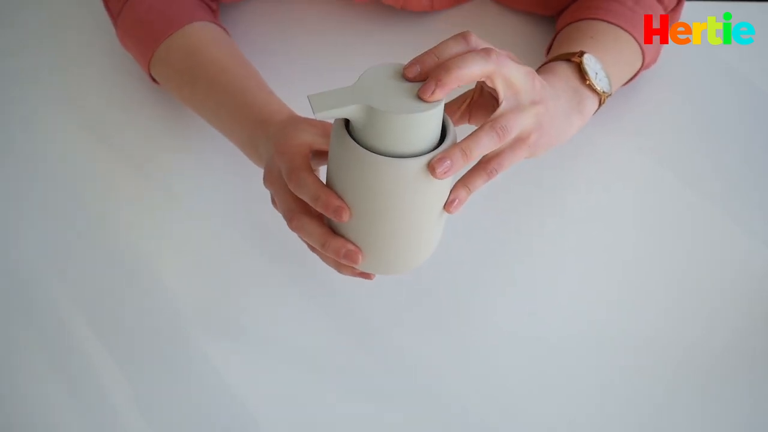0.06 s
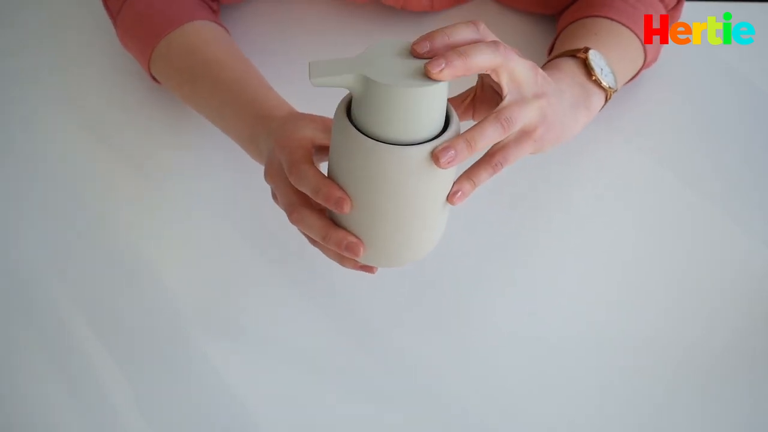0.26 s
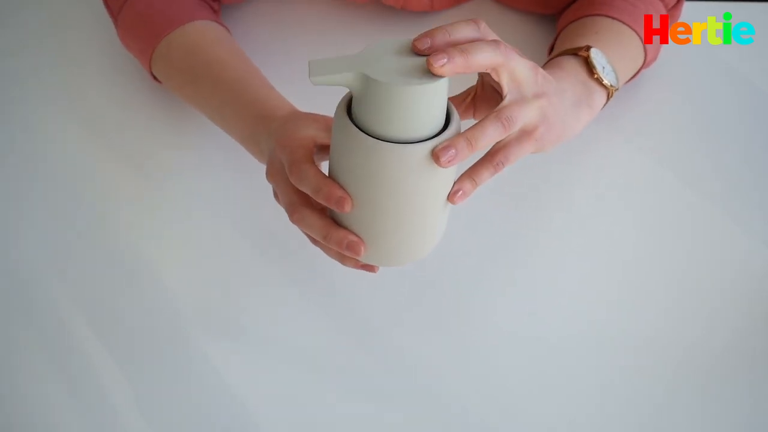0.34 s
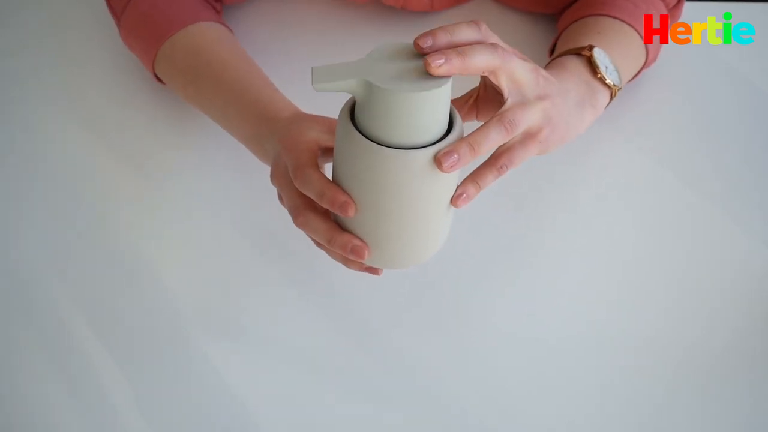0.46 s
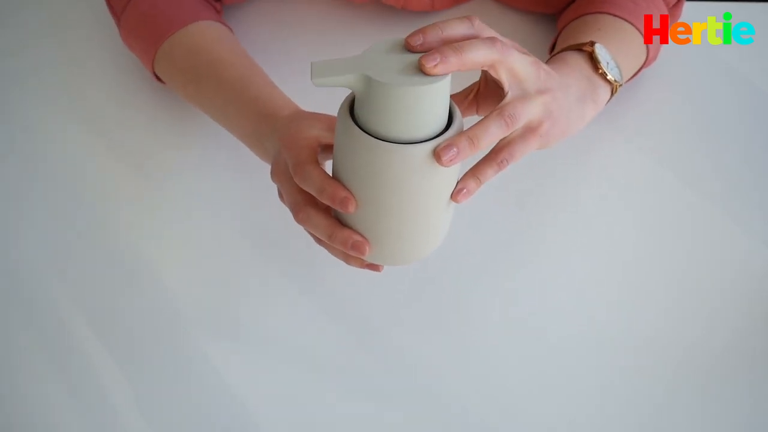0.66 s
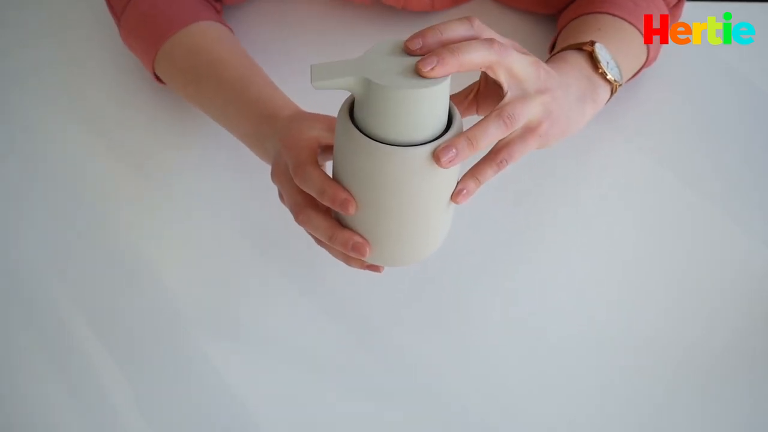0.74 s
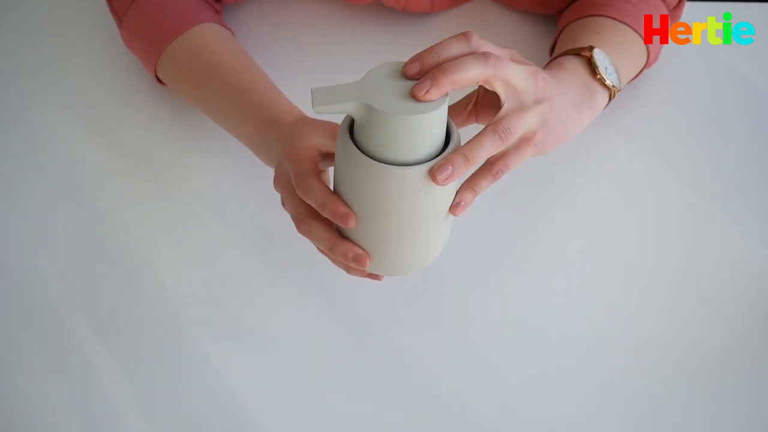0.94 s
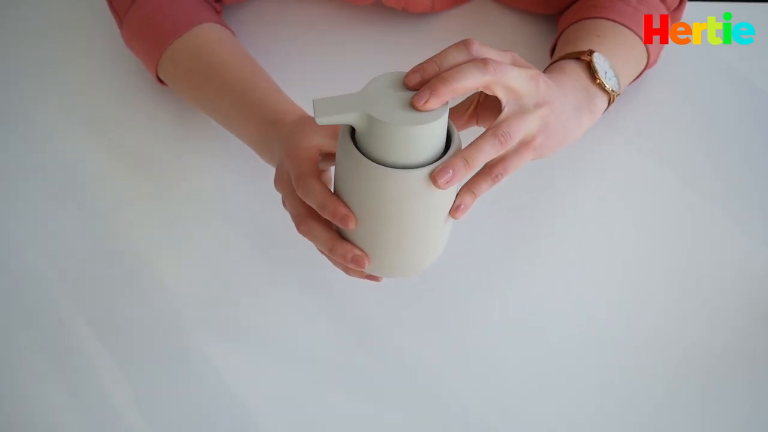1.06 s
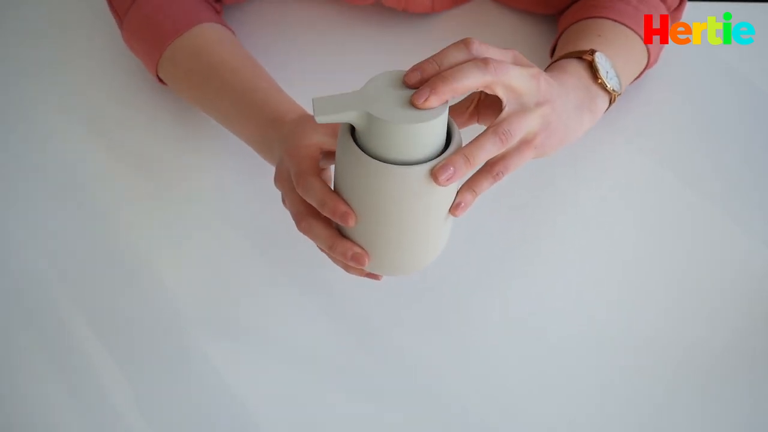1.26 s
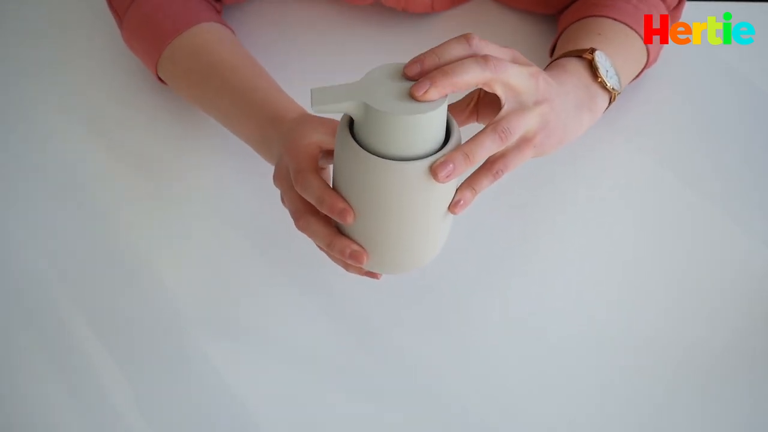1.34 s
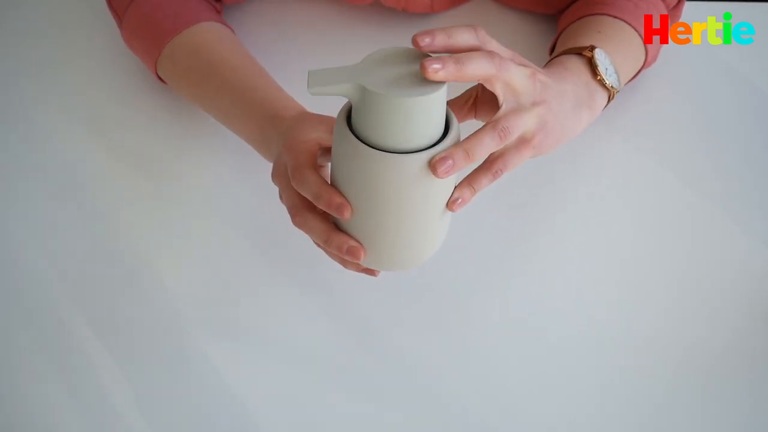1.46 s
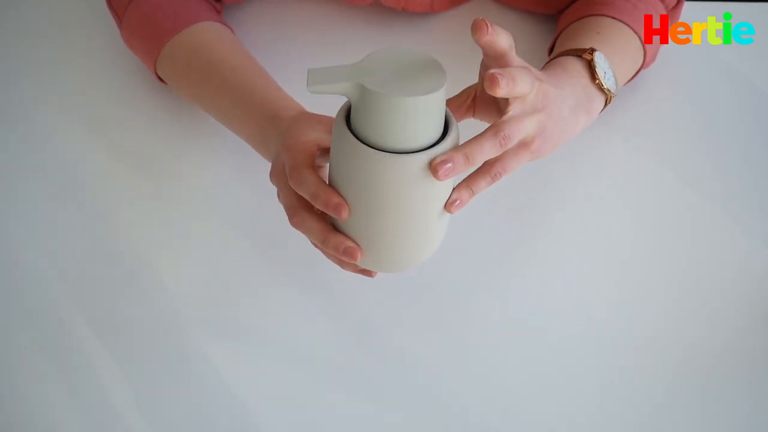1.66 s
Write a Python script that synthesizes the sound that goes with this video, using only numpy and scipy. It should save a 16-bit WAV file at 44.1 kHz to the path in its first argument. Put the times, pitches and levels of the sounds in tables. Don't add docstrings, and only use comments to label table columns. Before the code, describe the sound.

A hand works a soap dispenser pump, heard very close in a small reverberant room with steady low hum and hiss. A faint rub fades at the start; the plunger scrapes up to a loud, slightly distorted hollow clack at 0.24 s, and the jar rings. A soft thump comes at 0.4, a push with scraping and thud at 0.9, a faint tap at 1.28, then a second clack and rattle at 1.4.

```python
import sys
import numpy as np
from scipy import signal
from scipy.fft import rfft, irfft, next_fast_len
from scipy.io import wavfile
from scipy.ndimage import uniform_filter1d, map_coordinates

SR = 44100
rng = np.random.default_rng(int(sys.argv[2]) if len(sys.argv) > 2 else 0)


def transcribe(u):
    v = np.clip(np.atleast_2d(u).T, -1, 1)
    q = np.round(v * 32767).astype(np.int16)
    wavfile.write(sys.argv[1], SR, q)


def volts_from_db(level):
    exponent = np.asarray(level, float) / 20
    return 10 ** exponent


N = 74970


def unit(x):
    return x / np.sqrt(np.mean(x ** 2) + 1e-20)


def along(points, hz):
    f, value = np.transpose(points)
    return np.interp(np.log(hz + 1), np.log(f + 1), value)


def curves(rows):
    s, *columns = np.transpose(rows)
    return [np.interp(np.arange(N) / SR, s, column) for column in columns]


def filtered(x, response):
    size = next_fast_len(N + SR // 2)
    hz = np.fft.rfftfreq(size, 1 / SR)
    return irfft(rfft(x, size) * response(hz), size)[..., :N]


def ring(s, hz, db, t60, rise):
    t = np.maximum(np.arange(N) / SR - s, 0)
    return volts_from_db(db - 60 * t / t60) * (1 - np.exp(-t / rise)) * np.sin(2 * np.pi * hz * t)


# frequency in Hz, density in dB per Hz.
AIR_SPECTRUM = [(12, -40.5), (20, -7.5), (141, 3.5), (254, -7), (335, -7.5), (510, -15.5), (1150, -22.5),
                (1430, -22.5), (15800, -30.5)]


def air():
    hiss = filtered(rng.standard_normal(N), lambda f: volts_from_db(along(AIR_SPECTRUM, f)))
    return volts_from_db(-65) * unit(hiss)


# frequency in Hz, width in Hz, level in dB.
BARREL_MODES = [(1500, 390, -15.5), (3000, 110, 8.5), (3555, 1400, -2.5), (6000, 1300, 0.5),
                (7215, 900, -4), (10260, 2500, -12.5), (12100, 3000, -16)]


def barrel(x):
    def response(f):
        total = 0
        for k, (center, width, db) in enumerate(BARREL_MODES):
            band = 1j * f * width / (center * center - f * f + 1j * f * width)
            total = total + (-1) ** k * volts_from_db(db) * band
        return total
    return filtered(x, response)


# time in seconds, rub level in dB, cavity level in dB over the rub, cavity pitch in Hz.
PLUNGER_STROKES = [
    [(0, -75.5, 7, 894), (.03, -80, 6, 880), (.08, -93, 5, 878)],
    [(.168, -94.5, 2, 900), (.182, -52, 1.5, 920), (.192, -53, 4, 920), (.206, -55.5, 1, 983.5),
     (.22, -42.5, -3, 1000), (.23, -44.5, 2, 1050), (.25, -56, -5.5, 1110), (.275, -96, -1, 1100)],
    [(.884, -85, 7, 1150), (.896, -51.5, 4, 1112), (.912, -64.5, -2.5, 1119), (.96, -69, 5, 1110),
     (.972, -50.5, 3, 1096), (.99, -65, 3.5, 1080), (1.04, -55.5, -0.5, 1026), (1.134, -66.5, 4.5, 894),
     (1.146, -98, 10, 876)],
    [(1.315, -85, -6, 900), (1.336, -52, 7, 910), (1.35, -55, -5.5, 937), (1.361, -65.5, 2, 950),
     (1.367, -47, -9, 935), (1.378, -39.5, 6.5, 969), (1.392, -44.5, -6.5, 1050), (1.42, -58, 5, 1110),
     (1.44, -82, 4, 1090)],
]
# start in seconds, end in seconds.
PLUNGER_MOVES = [(0, .09), (.165, .28), (.88, 1.15), (1.31, 1.45)]


def strokes():
    cavity_width_hz, grit_per_s, grit_db, smooth_share = 120, 2000, 5, .6
    rub_db, cavity_db, hz = curves([row for stroke in PLUNGER_STROKES for row in stroke])
    size, sign, smooth = rng.standard_normal((3, N))
    grains = rng.random(N) < grit_per_s / SR
    grit = grains * volts_from_db(grit_db * np.clip(size, -2, 2)) * np.sign(sign)
    drag = smooth_share * smooth + (1 - smooth_share) * unit(grit)
    turn = np.exp(2j * np.pi * np.cumsum(hz) / SR)
    pole = np.exp(-np.pi * cavity_width_hz / SR)
    cavity = (turn * signal.lfilter([1], [1, -pole], drag / turn)).real
    t = np.arange(N) / SR
    moving = sum((t >= a) & (t < b) for a, b in PLUNGER_MOVES) * 1.0
    moving = uniform_filter1d(moving, size=300)
    return moving * volts_from_db(rub_db) * (unit(barrel(drag)) + volts_from_db(cavity_db) * unit(cavity))


THUMP_TIMES = [.416, .904, 1.335, .188]
# level in dB, pitch factor, tilt in dB per octave above 120 Hz.
THUMP_LEVELS = [(-32.5, .86, -3), (-27.5, 0.93, -3), (-43, 0.52, 2), (-46, .9, -0.5)]
TABLE_PITCHES = [120, 100, 217, 186, 285, 350, 475, 560, 750]
# level in dB, decay by 60 dB in seconds.
TABLE_MODES = [(1, .11), (-7.5, .1), (-3, 0.19), (-7.5, 0.061), (-4.5, .16), (-12, .1), (-15.5, 0.079),
               (-18.5, 0.099), (-17.5, 0.025)]
# time in seconds, level in dB.
ARM_SWAY = [
    (.4, -103),
    (.49, -50),
    (.55, -62),
    (.62, -63.5),
    (.7, -92.5),
]


def table():
    rise_s, rumble_db, rumble_t60_s, rumble_hz = 0.0029, -14.5, 0.32, 320
    t = np.arange(N) / SR
    thump, fade = np.zeros(N), np.zeros(N)
    for s, (db, pitch, tilt_db) in zip(THUMP_TIMES, THUMP_LEVELS):
        for hz, (level, t60) in zip(TABLE_PITCHES, TABLE_MODES):
            mode_db = db + level + tilt_db * np.log2(hz / 120)
            thump += ring(s, hz * pitch, mode_db, t60, rise_s)
        swell = 1 - np.exp(-np.maximum(t - s, 0) / rise_s)
        fade += swell * volts_from_db(db + rumble_db - 60 * np.abs(t - s) / rumble_t60_s)
    thump = filtered(thump, lambda f: (1j * f / (50 + 1j * f)) ** 2)
    rumble = filtered(rng.standard_normal(N),
                      lambda f: f ** 3 / (f ** 3 + 150 ** 3) / (1 + (f / rumble_hz) ** 2))
    sway = filtered(rng.standard_normal(N), lambda f: f / (1 + (f / 32) ** 5))
    return thump + fade * unit(rumble) + volts_from_db(curves(ARM_SWAY)[0]) * unit(sway)


# time in seconds, level in dB.
SEAL_SLIPS = [(.1943, -29), (0.4, -35), (1.3415, -28.5), (1.332, -41.5), (1.372, -29.5), (.894, -37.5),
              (0.35, -51), (1.381, -40.5)]


def slips():
    s, _, _, hz = np.transpose([row for stroke in PLUNGER_STROKES for row in stroke])
    t = np.arange(N) / SR
    scratch, cavity = np.zeros(N), np.zeros(N)
    for at, db in SEAL_SLIPS:
        scratch += (t > at) * volts_from_db(db - 9 - 60 * np.abs(t - at) / 0.011)
        cavity += ring(at, np.interp(at, s, hz), db, 0.033, 0.00066)
    return barrel(scratch * rng.standard_normal(N)) + cavity


# time in seconds, peak in dB.
HEAD_CLACKS = [
    (.2379, 2),
    (1.39422, 2),
]
CLACK_EDGE = [2, -5]
# frequency in Hz, level in dB, decay by 60 dB in seconds, rise in seconds.
HEAD_MODES = [(1150, -22.5, .035, .002), (1370, -24, 0.011, 0.0012), (1896, -31, .05, 0.0015),
              (2500, -25, .005, .0004), (3175, -23.5, 0.011, 0.00013), (3630, -11, 0.0031, 0.0002),
              (4000, -15.5, 0.0028, 0.00046), (5590, -29, .012, .0003), (7447, -29, 0.0054, 0.0009)]
# delay in seconds, level in dB.
NEAR_ECHOES = [
    (.00265, -14),
    (.00435, -12),
]


def clacks():
    edge_hz, crack_db, crack_t60_s = 3300, -22, .01
    knock_hz, knock_peak_s, knock_fall = 1055, .0013, .75
    body_hz, body_db, body_t60_s = 520, -14.5, .011
    echo_hz, echo_width_hz = 1120, 800
    t = np.arange(N) / SR
    direct = np.zeros(N)
    for (s, db), edge in zip(HEAD_CLACKS, CLACK_EDGE):
        for hz, level, t60, rise in HEAD_MODES:
            direct -= ring(s, hz, db + level + edge * (hz > edge_hz), t60, rise)
        u = np.maximum(t - s, 0) / knock_peak_s
        press = np.abs(np.sin(np.pi * u / 2)) ** 1.3
        release = np.exp(-((u - 1) / knock_fall) ** 2)
        push = np.where(u < 1, press, release)
        direct -= volts_from_db(db) * push * np.sin(2 * np.pi * knock_hz * (t - s))
        direct += ring(s, body_hz, db + body_db, body_t60_s, 0.00087)
        crack = volts_from_db(db + crack_db - 60 * np.abs(t - s) / crack_t60_s)
        direct += (t > s) * crack * rng.standard_normal(N)

    def reflected(f):
        band = 1j * f * echo_width_hz / (echo_hz ** 2 - f * f + 1j * f * echo_width_hz)
        echoes = sum(volts_from_db(db) * np.exp(-2j * np.pi * f * s) for s, db in NEAR_ECHOES)
        return (1 + band * echoes) / (1 + 1j * f / 8000) ** 2
    return filtered(direct, reflected)


JAR_PITCHES = [1150, 1156, 1166, 1098, 1075, 1215, 1386, 1892, 930, 810]
# level in dB, decay by 60 dB in seconds.
JAR_MODES = [(-29.5, 0.18), (-39.5, .55), (-44.5, 1), (-49, .5), (-35, .35), (-40, 0.65), (-42.5, 0.15),
             (-56.5, .42), (-47.5, 0.17), (-47, .35)]


def jar():
    waver_db, waver_per_s = 3, 40
    knots = rng.standard_normal((len(JAR_MODES), 100))
    place = np.arange(N) * waver_per_s / SR
    ringing = np.zeros(N)
    for k, (level, t60) in enumerate(JAR_MODES):
        waver = volts_from_db(waver_db * map_coordinates(knots[k], [place]))
        for s, db in HEAD_CLACKS:
            ringing += waver * ring(s, JAR_PITCHES[k], db + level, t60, 0.0037)
    return ringing


TICK_TIMES = [1.278, .423, 1.409, 1.419, .249]
TICK_LEVELS = [-54.5, -63, -43, -41.5, -47.5]


def ticks():
    tick_hz = 3400
    t = np.arange(N) / SR
    bursts = sum((t > s) * volts_from_db(db - 60 * np.abs(t - s) / 0.0078) for s, db in zip(TICK_TIMES, TICK_LEVELS))
    taps = bursts * rng.standard_normal(N)
    return filtered(taps, lambda f: 2j * f * tick_hz / (tick_hz ** 2 - f * f + 1j * f * tick_hz))


# frequency in Hz, decay by 60 dB in seconds.
ROOM_DECAY = [(150, 0.9), (500, .4), (1100, 0.45), (2000, 0.48), (3500, 0.52), (6000, 0.21), (12000, 0.36)]
# frequency in Hz, level in dB.
ROOM_TONE = [(150, 4.5), (350, 8.5), (700, -12), (1150, 3.5), (2300, -5.5), (3300, 2.5), (8000, -1.5)]


def room(x):
    gap_s = 0.0063
    hz, t, z = signal.stft(rng.standard_normal(SR), SR, nperseg=256)
    decay_db = along(ROOM_TONE, hz)[:, None] - 60 * t / along(ROOM_DECAY, hz)[:, None]
    tail = signal.istft(z * volts_from_db(decay_db), SR, nperseg=256)[1]
    tail = tail * (1 - np.exp(-np.arange(len(tail)) / (gap_s * SR)))
    return signal.fftconvolve(x, tail / np.linalg.norm(tail))[:N]


def scene():
    near = strokes() + table() + slips() + clacks() + ticks()
    return (near + volts_from_db(-14.5) * room(near) + jar() + air())[None]


def band_limit(x):
    return signal.sosfilt(signal.butter(12, 16260, fs=SR, output="sos"), x)


def record(dry):
    clip_top, clip_hard, top_hz = .99, 6, 15700
    clipped = dry / (1 + np.abs(dry / clip_top) ** clip_hard) ** (1 / clip_hard)
    mix = filtered(clipped, lambda hz: hz < top_hz)
    return band_limit(mix)


dry = scene()
out = record(dry)
transcribe(out)
```